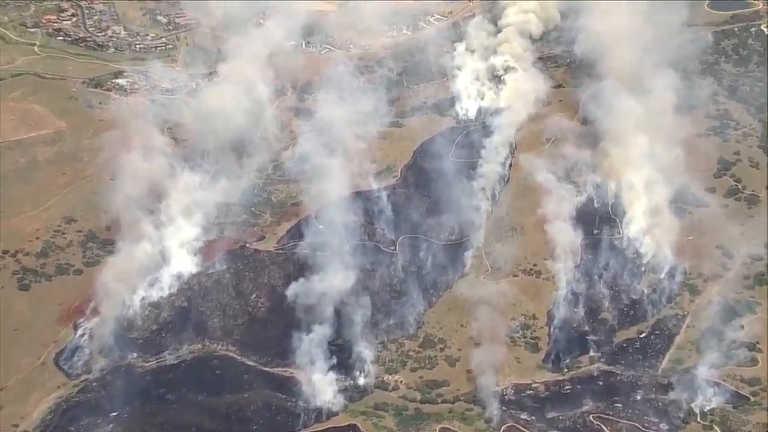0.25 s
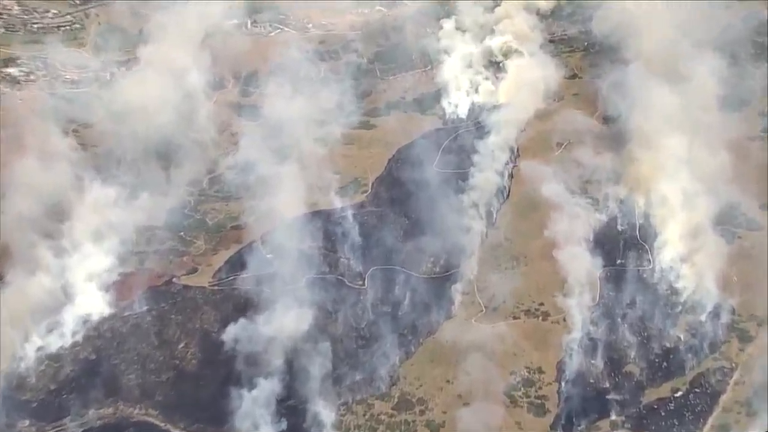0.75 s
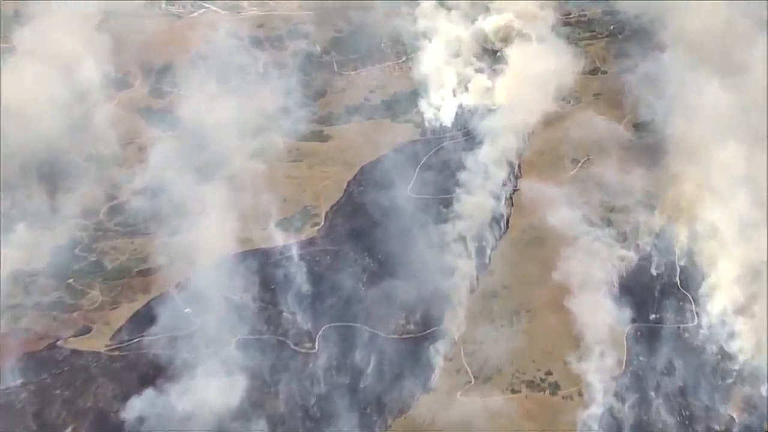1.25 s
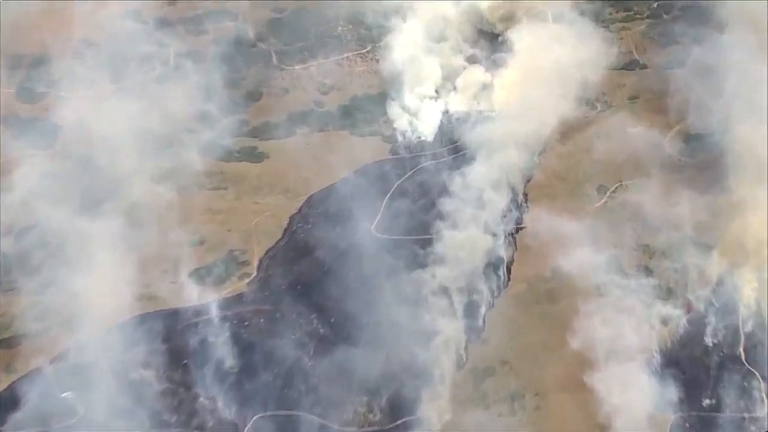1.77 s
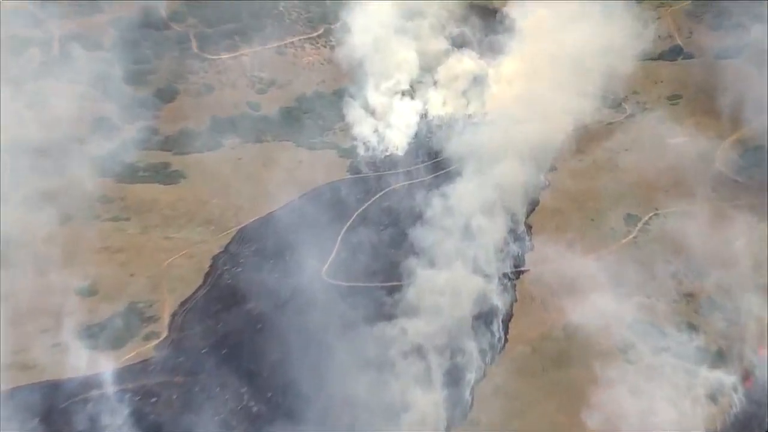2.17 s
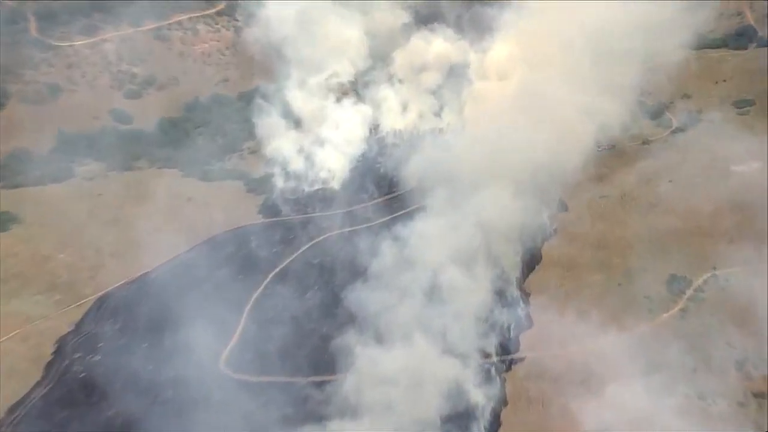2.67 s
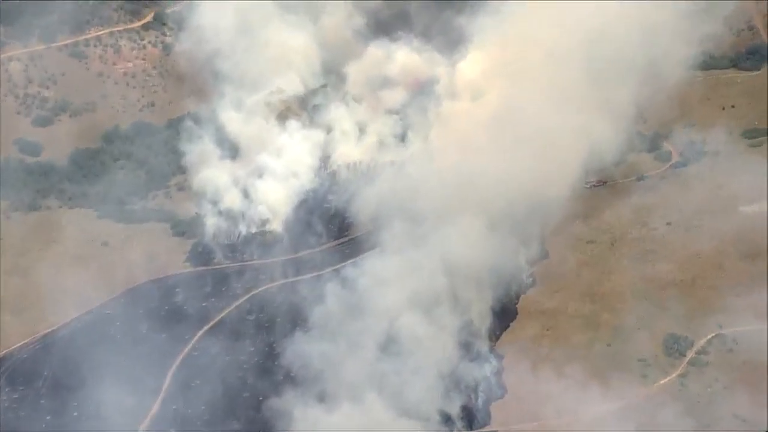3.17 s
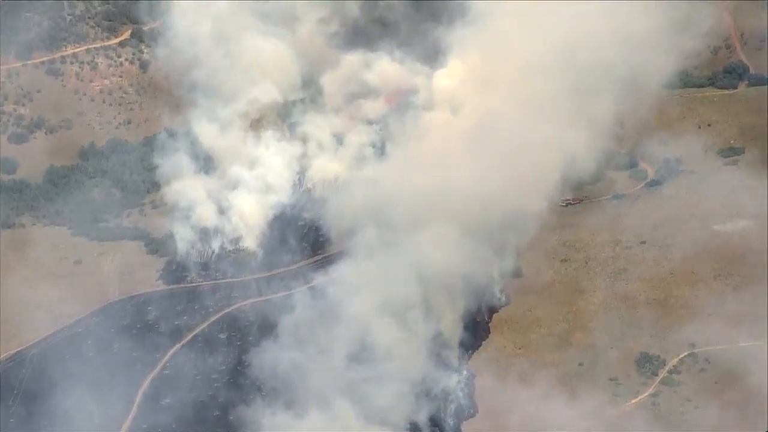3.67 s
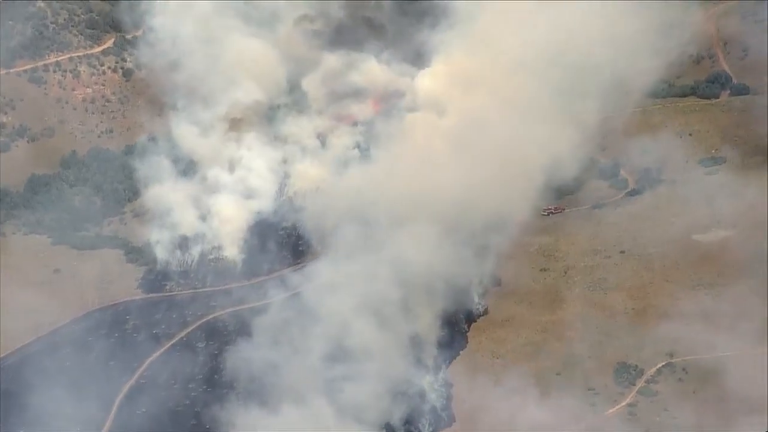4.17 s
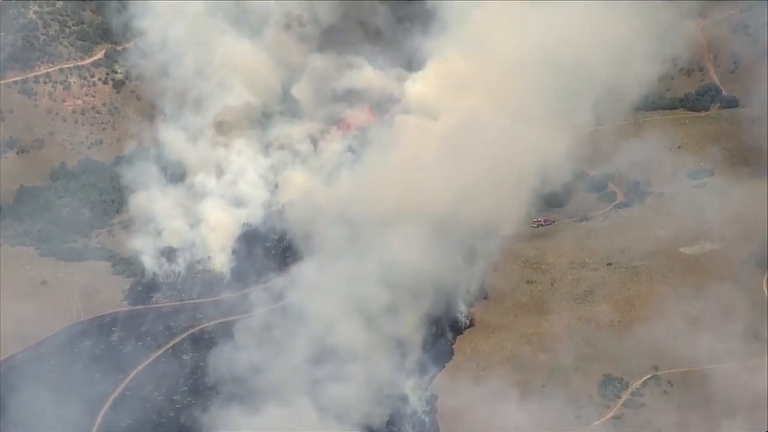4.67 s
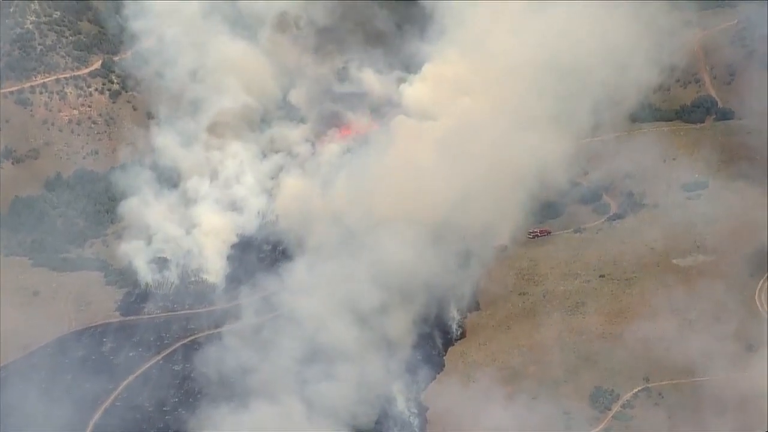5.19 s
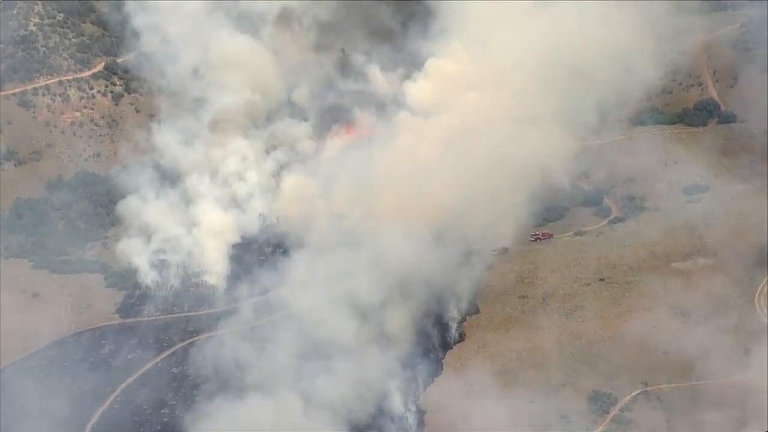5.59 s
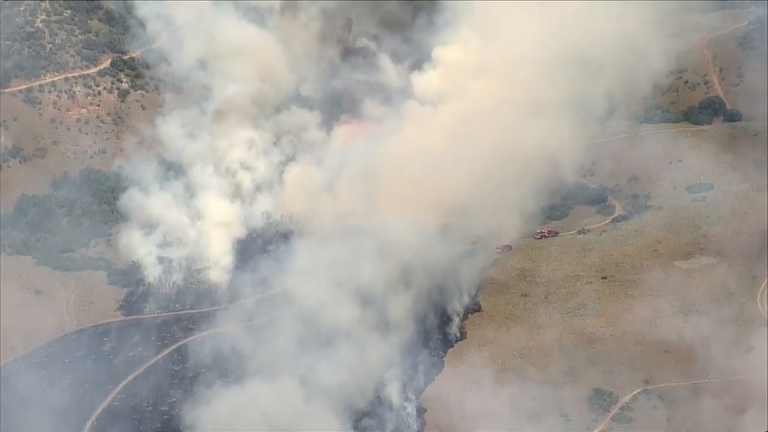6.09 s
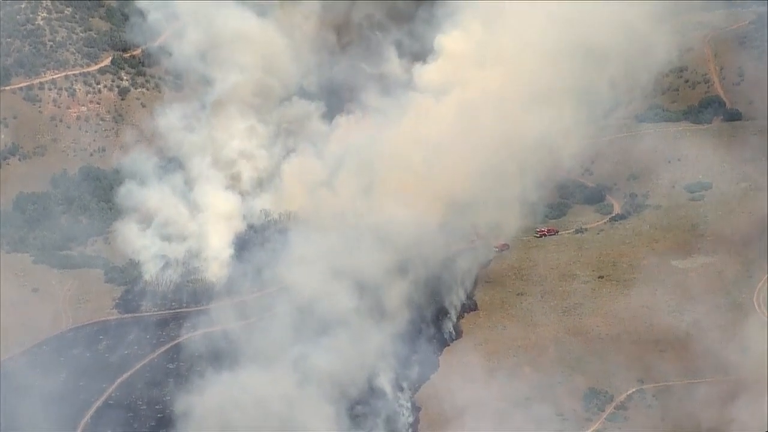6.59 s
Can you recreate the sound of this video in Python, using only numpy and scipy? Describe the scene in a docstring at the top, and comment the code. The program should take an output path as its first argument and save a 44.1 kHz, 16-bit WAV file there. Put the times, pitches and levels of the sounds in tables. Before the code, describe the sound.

Faint, unbroken helicopter cabin drone: thin electronic-sounding gear whine with a slight flutter, soft rushing air and a low hum underneath, no events.

```python
"""In the cabin of a cruising helicopter, heard faintly over an audio feed: the main gearbox whines on a few
fixed pitches, sums of sines at the tooth-meshing rates, modulated by uneven teeth and passing planets.
One shaft clock drives gears and rotors, so their pitches drift together; accessories add thin lines.
The rotors hum underneath as low harmonic series. Air hisses past as filtered noise, and the turbine
adds faint whistles made of narrow noise bands."""
import sys
import numpy as np
from scipy.fft import rfft, irfft, next_fast_len
from scipy.io import wavfile
from scipy.ndimage import map_coordinates

SR = 44100
rng = np.random.default_rng(int(sys.argv[2]) if len(sys.argv) > 2 else 0)


def to_wav(s):
    """Save 16-bit WAV."""
    ch = np.atleast_2d(s).T  # columns
    pcm = np.round(np.clip(ch, -1, 1) * 32767)  # PCM
    wavfile.write(sys.argv[1], SR, pcm.astype(np.int16))


N = 301644

# Nominal rates of the mast, bevel teeth, tail blades and pinion teeth, before the speed hunts; f/Hz
MAST_HZ, BEVEL_HZ, TAIL_HZ, PINION_HZ = 6.5272, 1725.3, 69.97, 339.43
RING_TEETH, PLANETS = 100, 5
TOP_HZ = 10600  # band limit of the feed

# Air-stream noise, relative spectral density: f/Hz, level/dB
AIR_SPECTRUM = [(20, -11), (32, -9.5), (48, -11.5), (90, -2), (180, -3), (320, -6.5), (550, -7.5),
                (1300, -7.5), (2500, -7), (3500, -11.5), (4500, -13), (6300, -15.5), (8700, -26),
                (9400, -38)]
# Cabin resonances (positive) and hollows (negative): f/Hz, width/Hz, level/dB
CABIN_RESONANCES = [(252, 20, 3), (406, 48, 8), (730, 24, -2), (865, 60, 1.5), (1053, 150, -4),
                    (2014, 180, -3), (4730, 470, -2), (5440, 220, -5)]
# Whistles of the gas turbine: f/Hz, width/Hz, level/dB
TURBINE_WHISTLES = [(8804, 60, -81.5), (10416, 150, -82.5)]
# Main rotor harmonics: multiple of the mast rate, level/dB
MAIN_ROTOR_HARMONICS = [(6, -68), (9, -79), (12, -79.5)]
# Tail rotor harmonics: multiple of the blade rate, level/dB
TAIL_ROTOR_HARMONICS = [(1, -59), (2, -65), (3, -71), (4, -75.5), (5, -81)]
# Accessory drive pinion: multiple of its tooth rate, level/dB
PINION_HARMONICS = [(5, -62.5), (9, -76.5), (10, -82), (11, -84), (12, -83.5), (13, -83.5), (15, -80),
                    (17, -74.5), (22, -84)]
# Other shafts and gears, one line each, plus a faint line six mast orders above the bevel tone: nominal f/Hz,
# level/dB
SHAFT_LINES = [(100.9, -71), (414.5, -72.5), (625.8, -78), (697.1, -76), (908.4, -81), (1115.7, -79.5),
               (1462.9, -81.5), (1764.4, -74.5), (2191, -77.5), (2398.3, -78), (6089.9, -75), (6167.9, -81),
               (6211, -80.5), (7419.5, -85)]
# Bevel mesh before load changes: multiple of the tooth rate, level/dB, flutter level/dB
BEVEL_HARMONICS = [(1, -53.5, -76), (2, -72.5, -74), (3, -74, -88)]
# Planetary mesh before load changes: multiple of the tooth rate, level/dB, flutter level/dB,
# passing-planet level/dB, throb depth (0-1), throbs per mast turn
PLANETARY_HARMONICS = [(1, -56.5, -80.5, -85, 0.03, 1), (2, -70.5, -74, -83, 0.65, 1),
                       (3, -70.5, -80, -97.5, 0.3, 1), (4, -62, -74, -86.5, 0.12, 3),
                       (5, -58.5, -76, -68.5, 0.12, 1), (6, -74.5, -81, -80.5, 0.5, 2),
                       (7, -65, -81.5, -75, 0.1, 2), (8, -86, -77, -82.5, 0.4, 2),
                       (9, -80.5, -76, -92, 0.2, 2), (10, -90.5, -79, -92.5, 0.5, 1)]
# Slow drift of tooth load: t/s, bevel level/dB, planetary overtone level/dB
LOAD_DRIFT = [(0, -1.7, 0.5), (3.3, 0.34, 0), (5.2, -2.1, 0), (6.84, -2, -1.3)]

# The governor hunts around its set speed: period/s, time of one crest/s, swing/cents, centre/cents
HUNT_S, CREST_S, HUNT_CENTS, CENTRE_CENTS = 2.355, 1.737, 0.694, -0.15
BEVEL_SWING_DB = 0.86  # bevel load rises and falls with the hunting
# Lines of many small parts: level at the low end, then slope upward
SCATTER_LOW_HZ, SCATTER_HIGH_HZ, SCATTER_DB, SCATTER_DB_PER_OCTAVE = 1098, 7796, -82, -2
# Random roughness of tooth contact relative to the tone; the planetary value is that of the fundamental
PLANETARY_RASP_DB, BEVEL_RASP_DB = -26.5, -19


def amp(db):
    """Logarithmic level: decibels to amplitude gain."""
    return 10 ** (np.asarray(db) / 20)


def unit(x):
    """Normalisation: x scaled to rms 1."""
    return x / np.sqrt(np.mean(np.abs(x) ** 2) + 1e-20)


def curves(rows):
    """Linear interpolation: one value per sample for each column after the time."""
    s, *columns = np.transpose(rows)
    return [np.interp(np.arange(N) / SR, s, column) for column in columns]


def wobble(rate):
    """Band-limited random modulation: a smooth curve through rate random knots a second."""
    knots = rng.standard_normal(int(N * rate / SR) + 4)
    coarse = np.linspace(0, N, 4096)
    smooth = map_coordinates(knots, [coarse * rate / SR], mode="mirror")
    return np.interp(np.arange(N), coarse, smooth)


def rasp(rate):
    """Random complex modulation: a quick ripple of level and phase at rms 1."""
    return unit(wobble(rate) + 1j * wobble(rate))


def throb(cycles, depth):
    """Amplitude modulation: one swell per cycle, at rms 1."""
    return unit(1 + np.clip(depth, 0, 1) * np.cos(2 * np.pi * (cycles + rng.random())))


def flutter(turns, slope, count=12, size=512):
    """Periodic modulation by uneven teeth: a complex ripple of rms 1 repeating each mast turn."""
    orders = np.r_[-count:-1, 2:count + 1]
    angle = np.arange(size) / size
    phases = np.outer(orders, angle) + rng.random((len(orders), 1))
    pattern = np.abs(orders) ** -float(slope) @ np.exp(2j * np.pi * phases)
    return unit(np.interp(turns % 1, angle, pattern))


def tone(cycles, envelope=1):
    """Phasor modulation: a sine, of rms 1 if unmodulated; a complex envelope bends level and phase."""
    phase = 2 * np.pi * (cycles + rng.random()) + np.angle(envelope)
    return np.sqrt(2) * np.abs(envelope) * np.cos(phase)


def filtered(x, response):
    """Linear filtering: the spectrum of x times a response of frequency."""
    m = next_fast_len(N + SR // 2)
    return irfft(rfft(x, m) * response(np.fft.rfftfreq(m, 1 / SR)), m)[..., :N]


def airflow(level_db):
    """Broadband flow noise: the steady hiss of the air stream, coloured by cabin resonance."""
    air_hz, air_db = np.transpose(AIR_SPECTRUM)

    def colour(f):
        cabin_db = sum(boost / (1 + (2 * (f - centre) / width) ** 2)
                       for centre, width, boost in CABIN_RESONANCES)
        return amp(np.interp(np.log(f + 1), np.log(air_hz), air_db) + cabin_db)

    return amp(level_db) * unit(filtered(rng.standard_normal(N), colour))


def turbine():
    """Narrow-band noise: the gas turbine's faint, airy whistles."""
    def whistle(hz, width):
        return unit(filtered(rng.standard_normal(N), lambda f: 1 / (1 + (2 * (f - hz) / width) ** 2)))

    return sum(amp(db) * whistle(hz, width) for hz, width, db in TURBINE_WHISTLES)


def rotors(clock):
    """Harmonics of blade pulses: a low hum; the tail rotor wavers in the main rotor's wake."""
    main = sum(amp(db + 0.65 * wobble(5.1)) * tone(round(k) * MAST_HZ * clock)
               for k, db in MAIN_ROTOR_HARMONICS)
    # slow and quick phase wander, in blade cycles, shared by all tail harmonics
    blades = TAIL_HZ * clock + 0.069 * wobble(1.5) + 0.0041 * wobble(12)
    tail = sum(amp(db + 0.59 * wobble(8)) * tone(round(k) * blades) for k, db in TAIL_ROTOR_HARMONICS)
    return main + tail


def accessories(clock, count=24):
    """Superposition of line spectra: unsteady pinion and shaft lines, steady lines of small parts."""
    pinion = [(round(k) * PINION_HZ, db) for k, db in PINION_HARMONICS]
    clear = sum(amp(db + 1.1 * wobble(6)) * tone(hz * clock + 0.017 * wobble(8))
                for hz, db in pinion + list(SHAFT_LINES))
    # one random pitch in each of count equal musical intervals
    span = np.log2(SCATTER_HIGH_HZ / SCATTER_LOW_HZ)
    octaves = span * (np.arange(count) + rng.random(count)) / count
    small = sum(amp(SCATTER_DB + SCATTER_DB_PER_OCTAVE * up) * tone(SCATTER_LOW_HZ * 2 ** up * clock)
                for up in octaves)
    return clear + small


def bevel_stage(clock, load_db):
    """Gear meshing: the input bevel gear sings at its tooth rate and throbs as the mast turns."""
    turns, out = MAST_HZ * clock, np.zeros(N)
    swell = throb(turns, depth=0.22)
    for k, db, flutter_db in BEVEL_HARMONICS:
        steady = amp(db + 0.37 * wobble(10)) * (swell + amp(BEVEL_RASP_DB) * rasp(rate=60))
        uneven = amp(flutter_db + 2.4 * wobble(8)) * flutter(turns, slope=0.81)
        out += tone(round(k) * BEVEL_HZ * clock, steady + uneven)
    return amp(load_db) * out


def planetary_stage(clock, load_db):
    """Gear meshing with sidebands: planets mesh with the ring and beat against the tooth tone in passing."""
    turns, out = MAST_HZ * clock, np.zeros(N)
    for k, db, flutter_db, planets_db, depth, throbs in PLANETARY_HARMONICS:
        k = round(k)
        # the beat shifts by a quarter cycle from each harmonic to the next
        passing = amp(planets_db) * np.exp(-2j * np.pi * (PLANETS * turns + k / 4))
        uneven = amp(flutter_db + 0.61 * wobble(6.3)) * flutter(turns, slope=0.58)
        # tooth contact grows rougher with the order
        rough = amp(PLANETARY_RASP_DB) * np.sqrt(k) * rasp(rate=50)
        steady = amp(db + 0.3 * wobble(9)) * (1 + rough)
        envelope = (steady + uneven + passing) * throb(round(throbs) * turns, depth)
        # load hardens the tooth contact, which changes only the overtones
        out += amp(load_db * (k > 1)) * tone(k * RING_TEETH * turns, envelope)
    return out


def scene():
    """Common drive: one hunting shaft speed turns gears and rotors and shifts the bevel load."""
    hunt = np.cos(2 * np.pi * (np.arange(N) / SR - CREST_S) / HUNT_S)
    cents = CENTRE_CENTS + HUNT_CENTS * hunt
    clock = np.cumsum(2 ** (cents / 1200)) / SR  # seconds at nominal speed
    bevel_db, planetary_db = curves(LOAD_DRIFT)
    background = airflow(level_db=-57.5) + turbine() + rotors(clock)
    gearbox = (accessories(clock) + bevel_stage(clock, bevel_db + BEVEL_SWING_DB * hunt)
               + planetary_stage(clock, planetary_db))
    return (background + gearbox)[None]


def record(dry):
    """Band limitation: the feed keeps nothing above its upper limit."""
    return filtered(dry, lambda hz: hz < TOP_HZ)


dry = scene()
out = record(dry)
to_wav(out)
```